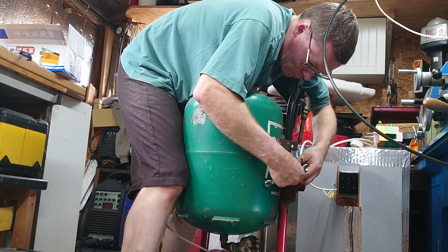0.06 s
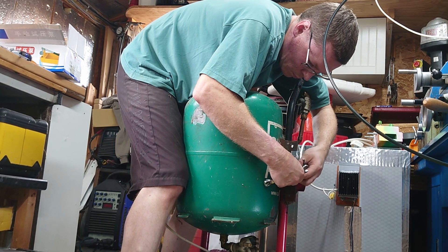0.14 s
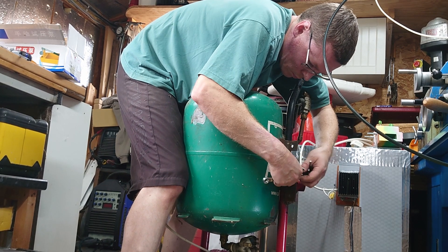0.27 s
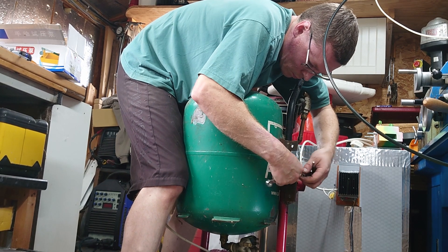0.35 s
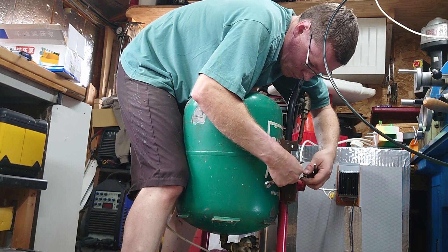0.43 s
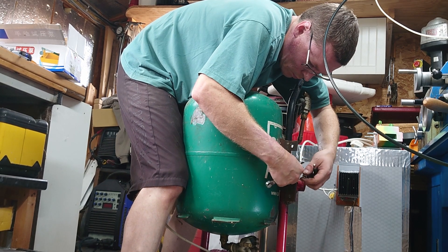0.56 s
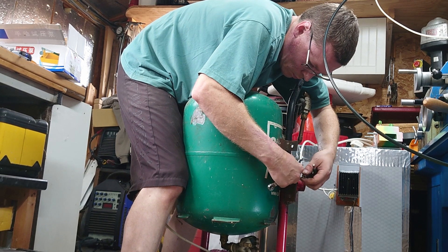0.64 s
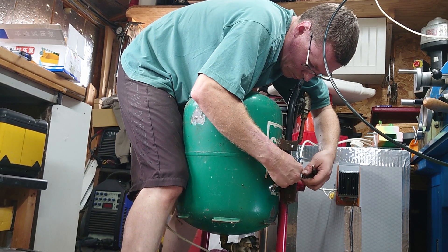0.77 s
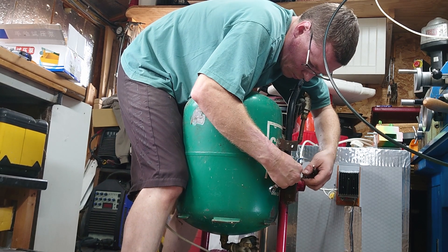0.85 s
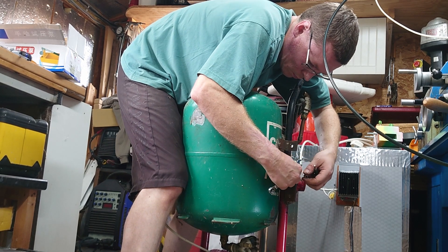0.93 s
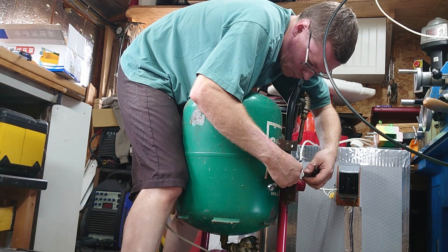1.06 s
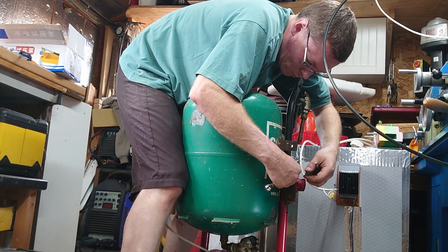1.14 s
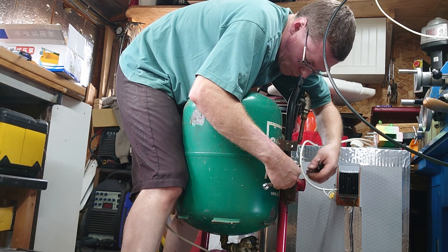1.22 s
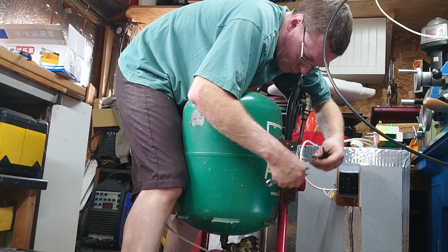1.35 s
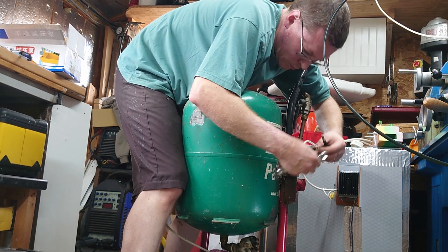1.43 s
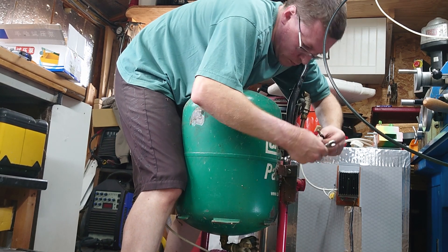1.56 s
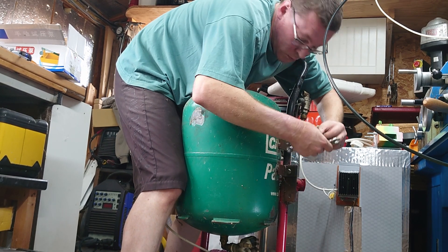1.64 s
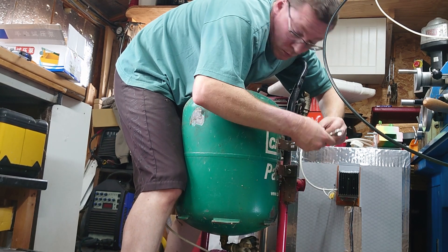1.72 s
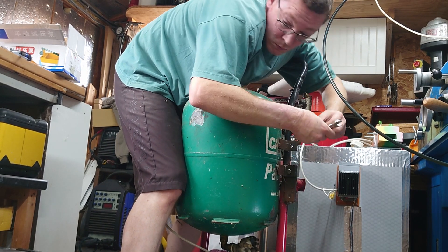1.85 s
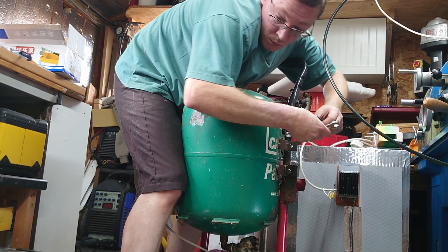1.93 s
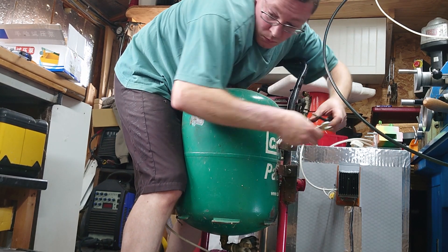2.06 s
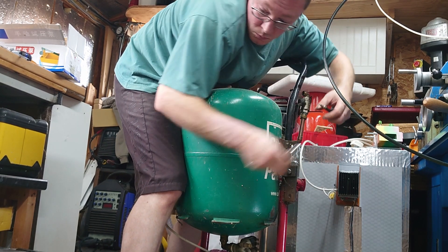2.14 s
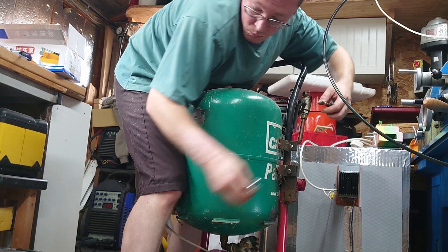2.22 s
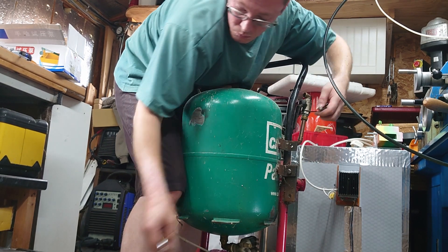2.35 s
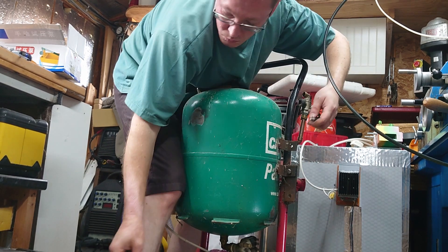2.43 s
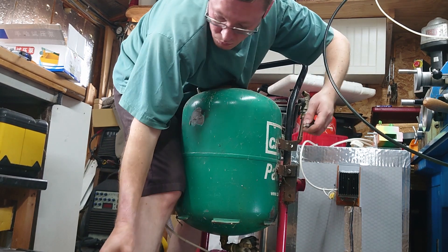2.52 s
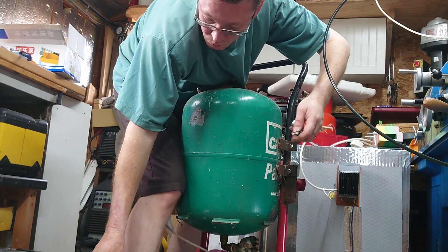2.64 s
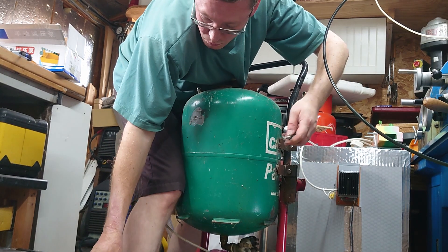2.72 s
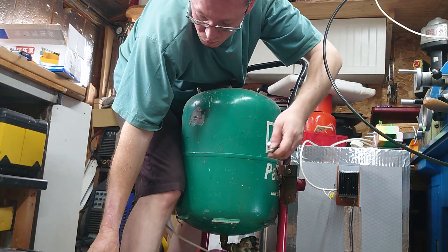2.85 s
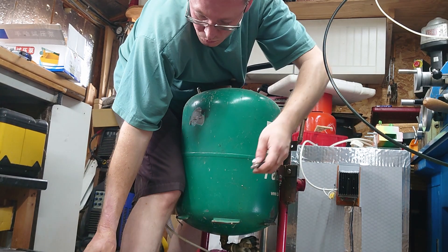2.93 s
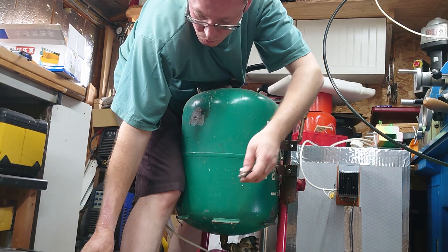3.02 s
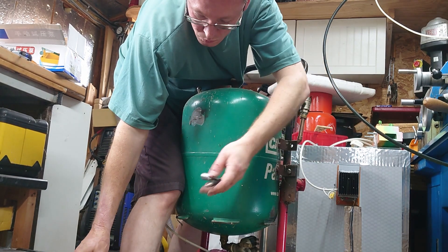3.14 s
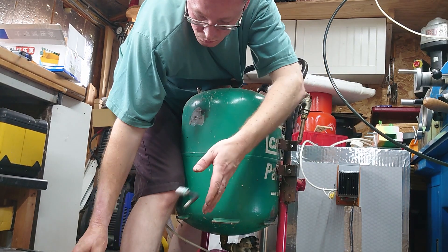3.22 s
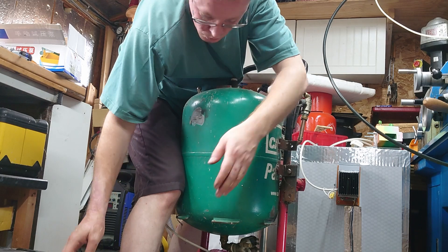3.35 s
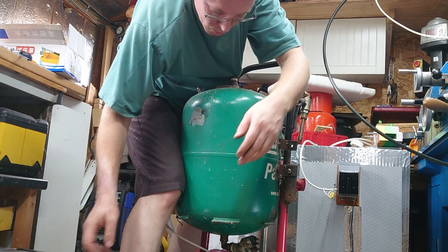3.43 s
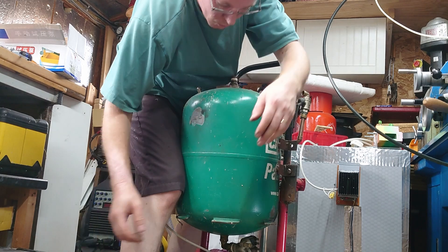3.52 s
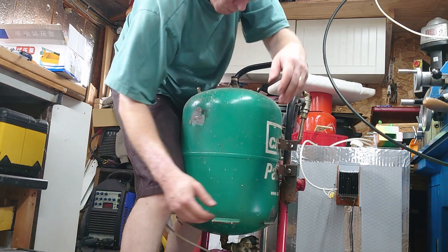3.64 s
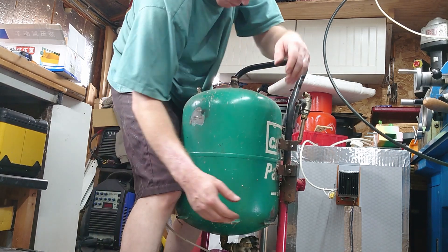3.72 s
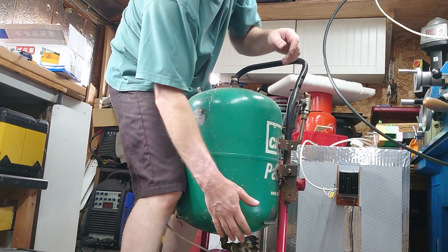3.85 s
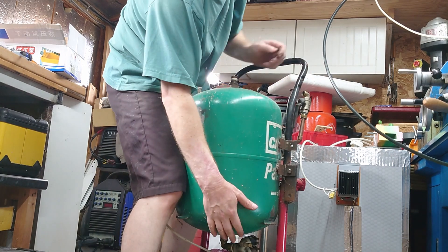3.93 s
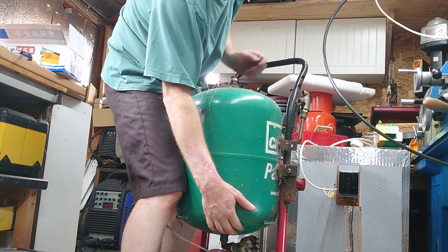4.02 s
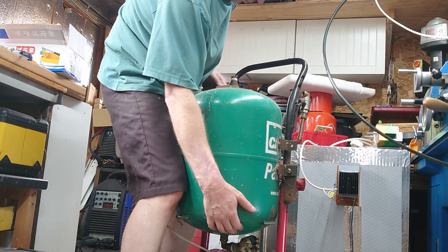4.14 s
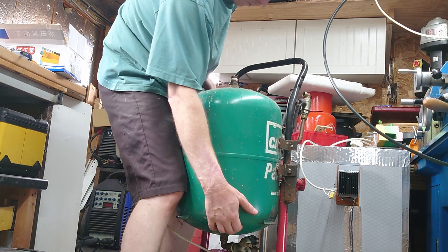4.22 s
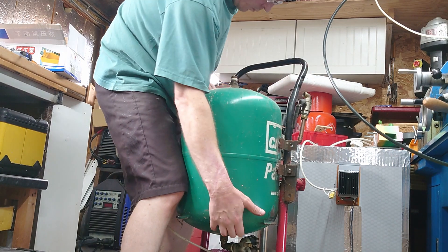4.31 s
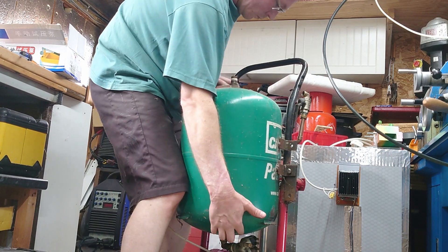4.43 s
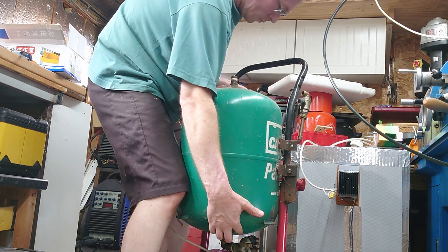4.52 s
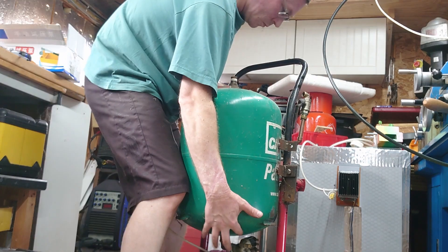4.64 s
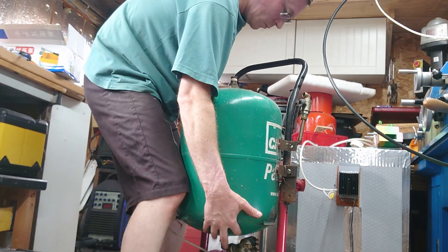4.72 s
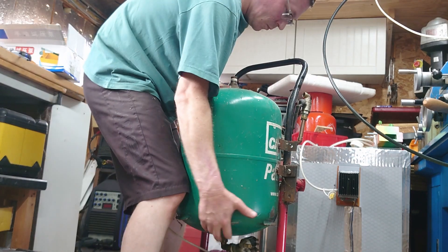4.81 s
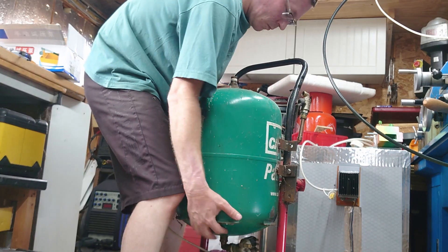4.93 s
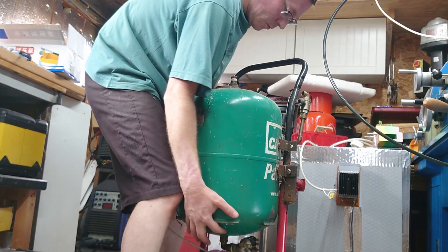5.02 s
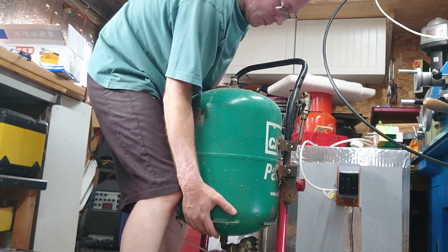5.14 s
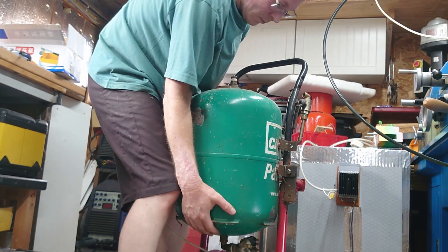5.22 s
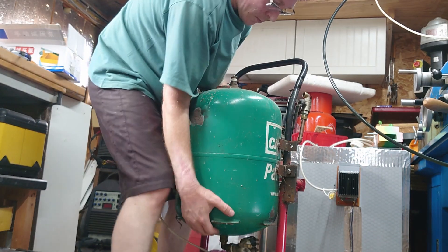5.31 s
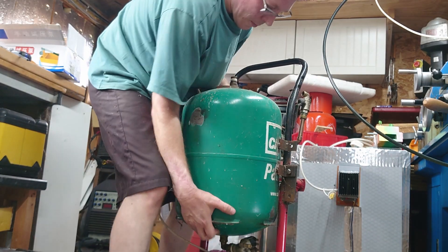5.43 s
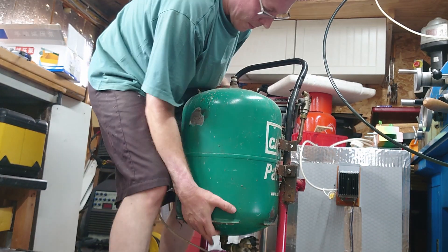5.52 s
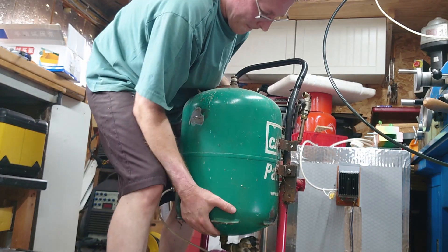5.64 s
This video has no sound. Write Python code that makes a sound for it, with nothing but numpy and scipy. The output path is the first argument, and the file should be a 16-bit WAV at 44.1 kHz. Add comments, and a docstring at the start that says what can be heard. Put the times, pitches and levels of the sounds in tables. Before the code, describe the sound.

Irregular light metal taps come first, dry and delicate. After a quieter gap, a tool clanks onto concrete and a steel fitting drops with bright, sharp impacts, zinging between bounces. The last clank fades in a short shed echo; then cloth and palm scuff a painted tank above faint fan noise. Close stereo microphone.

```python
"""Valve fittings clink as they are undone, a spanner is put down, a steel fitting drops and bounces ringing
over the floor, then sleeves and hands rub on a pressure tank on a hand truck in a wooden shed; a fan hums faintly.
Blows and clinks are a crack, decaying modes and room scatter, weighted in five registers; flying steel rings as
decaying sines. Rubbing is shaped noise, the truck rocks in low damped sines, the fan is noise and wavering tones."""
import sys
import numpy as np
from scipy import signal
from scipy.fft import rfft, irfft, next_fast_len
from scipy.io import wavfile
from scipy.ndimage import map_coordinates

SR = 44100
rng = np.random.default_rng(int(sys.argv[2]) if len(sys.argv) > 2 else 0)


def waveform_to_disk(signal):
    """Save audio, clipped to [-1, 1], as 16-bit WAV at the path in sys.argv[1]."""
    frames = np.transpose(np.atleast_2d(signal))
    scaled = np.clip(frames, -1, 1) * 32767
    samples = np.round(scaled).astype(np.int16)
    wavfile.write(sys.argv[1], SR, samples)


N = 250047

# Spanner and fitting hit the floor. Each row: start in seconds, force in dB, weight behind the blow in dB,
# hardness of the contact in dB, resonance of the struck spot in Hz.
FLOOR_BLOWS = [(2.7605, 22, -6, 0, 697), (2.9395, 5.5, -1, 8.5, 450), (3.188, -14.5, -2, 11, 453),
               (3.25, -12.5, -7, 14, 1910), (3.362, 34.5, -8.5, -15, 463), (3.3835, 32.5, 2.5, -8.5, 700),
               (3.418, 15, 4, 2.5, 426), (3.497, 12, 9.5, 4, 220), (3.528, 3, 15, 4.5, 180),
               (3.5585, 33.5, 1.5, -4, 246), (3.567, 27, 8.5, 5.5, 218), (3.659, 7.5, 11.5, 5.5, 213),
               (3.685, 3, 16.5, 9, 206), (3.82, 11.5, 4.5, 6.5, 450), (3.9553, 28.5, -18.5, 6, 803),
               (4.172, -12.5, 0.5, 10.5, 825)]
# A part rattles to rest in ever shorter hops. Each row: first contact in seconds, its force in dB.
SETTLES = [(3.005, -4), (4.054, -8.5)]
HOP_S, HOP_SHRINK, HOP_LOSS_DB = .05, 0.91, 2  # first flight, each flight over the last, loss per hop
HOP_WEIGHT_DB, HOP_HARDNESS_DB, HOP_SPOT_HZ = -4, 8, 490
# The floor (low) and the steel that lands on it (high). Each row: mode in Hz, relative level in dB, t60 in seconds.
FLOOR_MODES = [(94, -12.5, .25), (132.6, -7.5, 0.295), (174, 3, 0.31), (209.4, -0.5, .22), (231, 3.5, 0.13),
               (362, -11.5, 0.33), (448, -1.5, 0.3), (491.6, 5, 0.19), (580, -7.5, 0.16), (722, 10, 0.057),
               (792, 4, 0.11), (901, -0.5, 0.15), (1100, 6, 0.14), (1169, -2, 0.16), (1310, -4, 0.094),
               (1448, -7, .13), (3250, -1.5, .15), (3908, 5.5, 0.14), (5010, -1.5, 0.14),
               (6070, 9.5, 0.076), (6740, 8, 0.2), (6914, 11, 0.14), (7220, 8.5, 0.077), (11290, -1, 0.15),
               (10850, 13, 0.098), (11300, 7, 0.12), (11870, 9, 0.1245), (12700, 8.5, 0.11),
               (15130, 6.5, 0.11)]
# The fitting lands on its rim and zings. Each row: start in seconds, level in dB.
RIM_HITS = [(3.5585, 13.5), (3.567, 16.5), (3.659, 8)]
# Tone of the zing. Each row: frequency in Hz, gain in dB.
RIM_TONE = [(200, -50), (4000, -23), (7000, 1.5), (10500, -1.5), (15500, -1)]
# The steel fitting ringing freely. Each row: mode in Hz, level in dB before the flight's own, t60 in seconds.
FITTING_MODES = [(2560, -50.5, 2.5), (5065, -48, 2.6), (8530, -68, .6), (11360, -60.5, .6),
                 (12800, -56, .5)]
# The fitting is in the air between landings. Each row: start in seconds, stop in seconds, added level in dB.
FLIGHTS = [(3.4, 3.5, 3), (3.497, 3.5663, 5), (3.66, 3.82, -22)]
WAVER_HZ, WAVER_DB = 23, 3  # rate and depth of a slight level waver in the ring

# Taps at the valve. Each row: start in seconds, force in dB, hardness of the contact in dB,
# resonance of the struck part in Hz.
CLINKS = [(0.002, -8.5, -0.5, 2060), (0.072, -13, -4.5, 1115), (0.126, -11.5, -1, 1820),
          (0.144, -4, -1, 1857), (0.157, -15, 6, 4650), (0.335, -14.5, -6.5, 6200), (0.459, -12, 0.5, 1740),
          (0.546, -12, -14, 826), (0.856, -20, -17, 820), (1.0208, -3, -20, 1140), (1.042, -14, -5, 3520),
          (1.056, -10.5, 4, 3370), (1.094, -9.5, -5.5, 2600), (1.21, -13, -5.5, 5240),
          (1.863, -38.5, 22.5, 6400), (2.461, -38, 15.5, 1100)]
# The valve and its pipe. Each row: mode in Hz, relative level in dB, t60 in seconds.
VALVE_MODES = [(184, 0, 0.28), (853, 18.5, 0.1), (924, 5, 0.19), (1218, 3.5, 0.26), (1760, 8.5, 0.11),
               (2015, 6.5, 0.27), (2660, -17, 0.12), (3460, 6.5, 0.17), (4370, 6, 0.14), (5950, -31, 0.079),
               (6560, 10.5, 0.18), (7600, -27, 0.13), (11500, -8, .15), (13500, -10, 0.089)]
TAP_WEIGHT_DB = -14.5  # fingers put little weight behind a tap

# Registers of a contact: thump, knock, clank, click, sizzle. Each row: low edge in Hz, high edge in Hz.
REGISTERS = [(155, 270), (440, 980), (1030, 1650), (2150, 6600), (10500, 15500)]
WEIGHT_DULLS = 0.25  # dB of clank lost per dB of weight: a heavy blow stays longer in contact
# a contact this soon after another, and not this much stronger, is a rebound
REBOUND_S, FRESH_DB = .12, 3

# Sleeves sweep over the tank. Each row: strongest moment in seconds, swell time in seconds, relative level in dB.
STROKES = [(1.72, 0.24, -67.5), (2.09, 0.055, -71), (4.59, 0.055, -65), (4.77, 0.054, -64.5),
           (4.91, 0.13, -58), (5.148, 0.1, -54.5), (5.46, 0.15, -57.5), (5.66, 0.064, -64.5)]
RELEASE_SHARE = 0.57  # a stroke dies away in this share of its swell time
# Colour of the cloth noise. Each row: frequency in Hz, relative density in dB per Hz.
CLOTH = [(710, -29), (1200, -18), (1440, -11), (1560, -4), (2250, -4), (3220, 1.5), (6160, -1), (8000, -25),
         (10100, -9.5), (16000, -5.5)]
# A palm slips on the paint. Each row: centre in seconds, half length in seconds, level in dB.
SLIPS = [(4.91, 0.015, -44.5), (4.3, .025, -69.5)]
# Hiss of skin on paint. Each row: frequency in Hz, relative density in dB per Hz.
SKIN = [(1500, -30), (4000, -4), (6500, -3), (8000, -16), (9500, -3), (15000, 0)]

# The truck rocks under the load. Each row: start in seconds, decay scale in seconds, relative level in dB.
ROCK = [(1.022, 0.18, -47), (4.861, 0.15, -67), (5.159, 0.14, -77.5), (5.47, 0.14, -75)]
# The loaded truck's own modes. Each row: frequency in Hz, relative level in dB.
TRUCK_MODES = [(28, -1.5), (63, 3), (81, 5), (124, 5.5), (180, 9), (226, 2)]
# Colour of fan and room air. Each row: frequency in Hz, relative density in dB per Hz.
AIR = [(25, 1.5), (68, -8), (110, -14), (330, -21), (510, -5.5), (760, -13), (1070, -6.5), (2400, -20),
       (4700, -23.5), (5900, -18), (7300, -39.5), (9500, -40.5), (11200, -28), (15800, -25.5)]
# Fan tones. Each row: frequency in Hz, relative level in dB.
HUM = [(532.9, -73), (710.6, -77.5), (1061, -70.5), (1287, -84), (1593, -76.5)]

# Tail of the shed. Each row: frequency in Hz, t60 in seconds.
SHED = [(100, .45), (250, .36), (700, .28), (2000, .3), (6000, .26), (14000, .18)]
# Likeness of diffuse sound at the two microphones. Each row: frequency in Hz, left-right correlation.
ALIKE = [(30, 0), (130, 0.58), (280, 0.82), (550, 0.35), (1100, 0), (15000, 0.03)]
# Stereo placing of the handling. Each row: frequency in Hz, left minus right in dB.
BALANCE = [(100, -1.9), (700, 0), (2000, -0.5), (4500, -4), (8000, -14.5), (11000, -1), (15000, 0.5)]
# Microphone tone on the contacts. Each row: frequency in Hz, gain in dB.
MIC = [(20, -33.5), (65, -13), (100, -13.5), (140, -2.5), (230, 1.5), (400, 1), (1600, -1.5), (1850, -2),
       (2600, 6), (5500, -1), (6500, -2), (7300, -17), (8300, -17.5), (10500, -3), (15500, 1)]
TOP_HZ = 15800  # upper band limit


def floor_blows():
    """Spanner and fitting land on the floor: weighty contacts excite floor and steel modes."""
    tone = dict(clank_db=-7, click_db=-19, sizzle_db=-17.5, sizzle_grows=1.5)
    return strikes([*FLOOR_BLOWS, *hops(count=3)], FLOOR_MODES, tone,
                   crack_db=-6, crack_grows=.05, rebound_db=-11,
                   spot_db=0.5, spot_width=0.17, spot_ring_db=-4.5, spot_t60=0.12,
                   ripple_db=2.5, ripple_hz=117.9,
                   ring_db=-13, late_db=-12.5, early_t60=0.15, lag=0.00023, build=0.00085)


def hops(count):
    """A part rattles to rest: each hop loses energy, so its contacts come closer together and weaker."""
    contacts = []
    for first_s, force in SETTLES:
        for k in range(count):
            s = first_s + HOP_S * sum(HOP_SHRINK ** j for j in range(k))
            contacts.append((s, force - HOP_LOSS_DB * k, HOP_WEIGHT_DB, HOP_HARDNESS_DB, HOP_SPOT_HZ))
    return contacts


def rim_zings():
    """A landing on the thin rim wakes the fitting's highest modes."""
    out = np.zeros((2, N))
    lo, hi = REGISTERS[-1]
    for s, db in RIM_HITS:
        hz, blow = contact(FLOOR_MODES, crack_db=-20, ring_db=-9, late_db=-5.5,
                           early_t60=.15, lag=.0002, build=.0007)
        blow = blow / np.sqrt(np.mean(abs(blow[:, (hz > lo) & (hz < hi)]) ** 2))
        add(out, s, irfft(blow * causal(amp(db + along(RIM_TONE, hz) + along(MIC, hz)))))
    return out


def flight_ringing(swell_s=0.01, damp_db_per_s=906):
    """The fitting's modes ring as decaying sines with a slight level waver; landing damps them fast."""
    out, t = np.zeros((2, N)), np.arange(SR) / SR
    for start, stop, level in FLIGHTS:
        landed_s = np.maximum(t - (stop - start), 0)
        for hz, db, t60 in FITTING_MODES:
            waver_phase, phase = rng.uniform(0, 2 * np.pi, (2, 2, 1))
            waver = WAVER_DB * np.sin(2 * np.pi * WAVER_HZ * t + waver_phase)
            fade = amp(db + level + waver - 60 * t / t60 - damp_db_per_s * landed_s)
            tone = np.sin(2 * np.pi * hz * t + phase / 2)
            add(out, start, fade * tone * (1 - np.exp(-t / swell_s)))
    return out


def valve_clinks():
    """Fittings clink as they are undone: light taps excite the modes of the valve and its pipe."""
    taps = [(s, force, TAP_WEIGHT_DB, hardness, hz) for s, force, hardness, hz in CLINKS]
    tone = dict(clank_db=-3.0, click_db=-6.5, sizzle_db=-11, sizzle_grows=1.15)
    return strikes(taps, VALVE_MODES, tone,
                   crack_db=-17, crack_grows=0.9, rebound_db=-7,
                   spot_db=9.5, spot_width=0.079, spot_ring_db=-9, spot_t60=.22,
                   ripple_db=3.0, ripple_hz=112.2,
                   ring_db=-3, late_db=2.5, early_t60=0.13, lag=.0001, build=0.0015)


def strikes(table, modes, tone, crack_db, crack_grows, rebound_db, spot_db, spot_width, spot_ring_db, spot_t60,
            ripple_db, ripple_hz, **mix):
    """Each contact stresses its spot's resonance; force, weight and hardness set the registers; rebounds crack less."""
    out = np.zeros((2, N))
    last_s, last_force = -1, 0
    for s, force, weight, hardness, spot_hz in sorted(table, key=lambda row: row[0]):
        rebound = s - last_s < REBOUND_S and force < last_force + FRESH_DB
        last_s, last_force = s, force
        crack = crack_db + crack_grows * hardness + rebound_db * rebound
        hz, blow = contact([*modes, (spot_hz, spot_ring_db, spot_t60)], crack, **mix)
        # where the steel is hit favours some of its many short, high resonances over others
        favour = map_coordinates(rng.standard_normal(1024), [hz / ripple_hz], mode="mirror")
        blow = blow * causal(amp(ripple_db * favour * np.minimum(hz / 3000, 1)))
        # bring each register to its level, with the gain gliding between registers
        points = []
        for (lo, hi), db in zip(REGISTERS, registers(force, weight, hardness, **tone)):
            power = np.mean(abs(blow[:, (hz > lo) & (hz < hi)]) ** 2)
            gain = db - 10 * np.log10(power)
            points += [(lo * 1.1, gain), (hi / 1.1, gain)]
        damping = 1j * hz * spot_width * spot_hz
        blow = blow * (1 + amp(spot_db) * damping / (spot_hz ** 2 - hz ** 2 + damping))
        add(out, s, irfft(blow * causal(amp(along(points, hz) + along(MIC, hz)))))
    return out


def registers(force, weight, hardness, clank_db, click_db, sizzle_db, sizzle_grows):
    """Weight feeds the thump and dulls the clank, hardness feeds the click, and sizzle grows with the click."""
    thump, knock = force + weight, force
    clank = force + clank_db - WEIGHT_DULLS * weight
    click = force + hardness + click_db
    sizzle = sizzle_grows * click + sizzle_db
    return thump, knock, clank, click, sizzle


def contact(modes, crack_db, ring_db, late_db, early_t60, lag, build, size=16384):
    """Spectrum of one blow: a crack, ringing modes, quick scatter off nearby clutter and the shed's tail."""
    t = np.arange(size) / SR
    # the crack reaches the left microphone first, the right one after the lag in seconds
    crack = np.zeros((2, size))
    crack[0, 0] = crack[1, int(np.clip(lag * SR, 0, SR / 1000))] = 1
    ring = np.zeros((2, size))
    for hz, db, t60 in modes:
        # high modes reach each microphone at a new strength with every blow
        strength = amp(db + rng.normal(0, 2.3, (2, 1)) * min(hz / 900, 1))
        ring += strength * (amp(-60 * t / t60) * np.cos(2 * np.pi * hz * rng.normal(1, .002) * t))
    early = diffuse(size) * amp(-60 * t / early_t60)
    # the tail fades at its own rate in each frequency band
    f, s, bands = signal.stft(diffuse(size), SR, nperseg=256)
    faded = bands * amp(-60 * s / along(SHED, f)[:, None])
    late = signal.istft(faded, SR)[1][:, :size]
    walls = (unit(early) + amp(late_db) * unit(late)) * (1 - np.exp(-t / build))
    blow = amp(crack_db) * unit(crack) + amp(ring_db) * unit(ring) + walls
    return np.fft.rfftfreq(size, 1 / SR), rfft(blow)


def rubbing(level_db=3.5, grain_db=0.5):
    """Cloth drags over the tank in tiny catches, noise of unsteady level; a palm slips with a short hiss."""
    t = np.arange(N) / SR
    stroke = np.zeros(N)
    for s, swell, db in STROKES:
        width = np.where(t < s, swell, RELEASE_SHARE * swell)
        stroke += amp(db) * np.exp(-((t - s) / width) ** 2)
    catches = amp(grain_db * wobble(300))
    cloth = unit(filtered(diffuse(N), lambda hz: amp(along(CLOTH, hz))) * catches)
    slip = sum(amp(db) * np.exp(-((t - s) / width) ** 2) for s, width, db in SLIPS)
    hiss = unit(filtered(diffuse(N), lambda hz: amp(along(SKIN, hz))))
    lean_right = amp([[-1.5], [1.5]])
    return (amp(level_db) * stroke * cloth + slip * hiss) * lean_right


def rocking(damping_hz=400):
    """The loaded truck shudders low on its tyres; its higher modes die sooner."""
    out, t = np.zeros((2, N)), np.arange(SR) / SR
    for s, decay, db in ROCK:
        sway = np.zeros(SR)
        for hz, level in TRUCK_MODES:
            fade_db = 20 * t / decay * (2.5 + hz / damping_hz)
            sway += amp(level - fade_db) * np.sin(2 * np.pi * hz * t)
        add(out, s, np.array([sway, sway]) * amp(db) * (1 - np.exp(-t / 0.011)))
    return out


def fan(air_db=-58.5, hum_db=2.0, waver=0.91):
    """Steady air noise under tones that drift a little in level and phase (waver in radians)."""
    t = np.arange(N) / SR
    air = unit(filtered(diffuse(N), lambda hz: amp(along(AIR, hz))))
    hum = np.zeros((2, N))
    for hz, db in HUM:
        level = amp(db + 2 * wobble(19.0))
        phase = waver * wobble(2.8) + rng.uniform(0, 0.72, (2, 1))
        hum += level * np.sin(2 * np.pi * hz * t + phase)
    return amp(air_db) * air + amp(hum_db) * hum


def diffuse(size):
    """Noise at two microphones, its likeness set by how mid and side share the power at each frequency."""
    def mid_side(hz):
        turn = np.arccos(np.clip(along(ALIKE, hz), -1, 1)) / 2
        return np.array([np.cos(turn), np.sin(turn)])
    mid, side = filtered(rng.standard_normal((2, size)), mid_side)
    return np.array([mid + side, mid - side])


def amp(db):
    """Decibels to amplitude."""
    return 10 ** (np.asarray(db) / 20)


def unit(x):
    """Scale to an RMS of one."""
    return x / np.sqrt(np.mean(x ** 2) + 1e-20)


def along(points, hz):
    """Read a curve of (Hz, value) points on a log frequency axis."""
    f, v = np.transpose(points)
    return np.interp(np.log(hz + 1), np.log(f + 1), v)


def wobble(rate):
    """A smooth random curve, rate knots a second."""
    knots = rng.standard_normal(int(N * rate / SR) + 4)
    return map_coordinates(knots, [np.arange(N) * rate / SR])


def filtered(x, response):
    """Shape the spectrum of x by a response of frequency."""
    m = next_fast_len(x.shape[-1] + 8192)
    return irfft(rfft(x, m) * response(np.fft.rfftfreq(m, 1 / SR)), m)[..., :x.shape[-1]]


def causal(gain):
    """The minimum-phase response with this gain: nothing sounds before the blow."""
    cepstrum = irfft(np.log(np.maximum(gain, 1e-6)))
    half = len(cepstrum) // 2
    cepstrum[1:half] *= 2
    cepstrum[half + 1:] = 0
    return np.exp(rfft(cepstrum))


def add(out, s, sound):
    """Mix a sound in at time s."""
    start = max(round(s * SR), 0)
    out[:, start:start + sound.shape[1]] += sound[:, :N - start]


def scene():
    """Blows, clinks and rubbing, a little to the right, over the rocking truck and the steady fan."""
    handling = floor_blows() + rim_zings() + flight_ringing() + valve_clinks() + rubbing()
    # half of the balance goes to each side
    placed = filtered(handling, lambda hz: amp(np.outer([.5, -.5], along(BALANCE, hz))))
    return placed + rocking() + fan()


def record(dry):
    """The loudest blows flatten towards full scale; a steep filter closes the band at the top."""
    clipped = dry / (1 + np.abs(dry) ** 6) ** (1 / 6)
    return filtered(clipped, lambda hz: 1 / (1 + (hz / TOP_HZ) ** 160))


dry = scene()
out = record(dry)
waveform_to_disk(out)
```